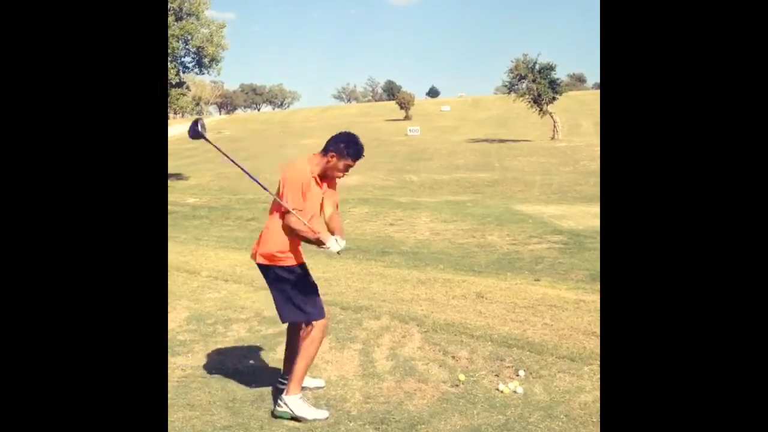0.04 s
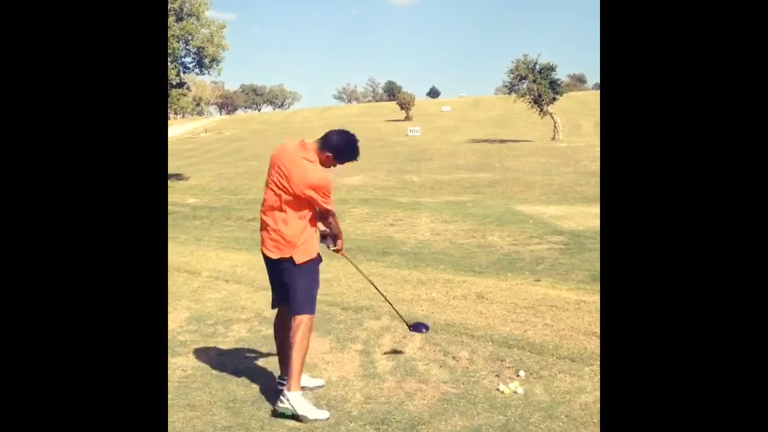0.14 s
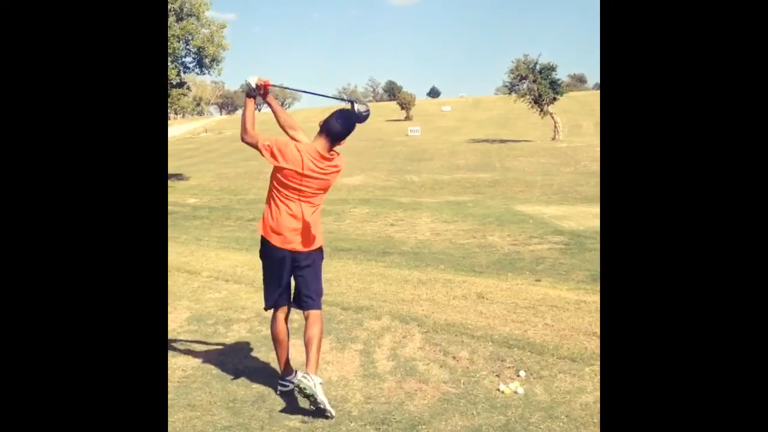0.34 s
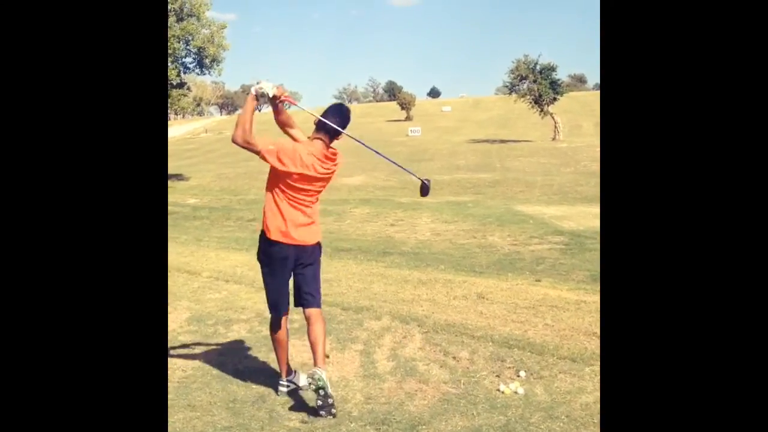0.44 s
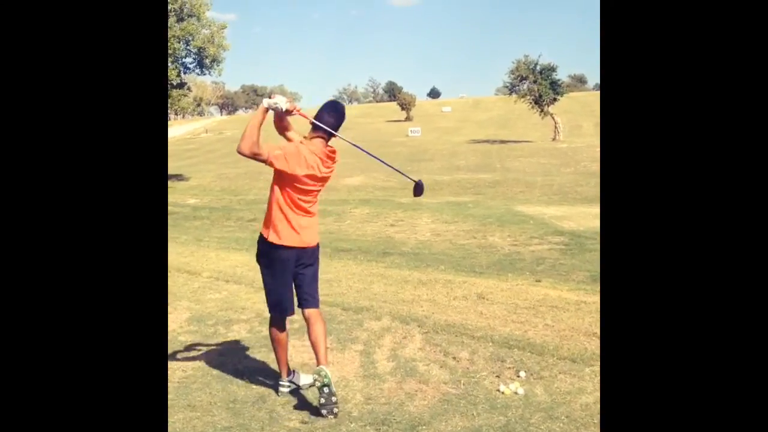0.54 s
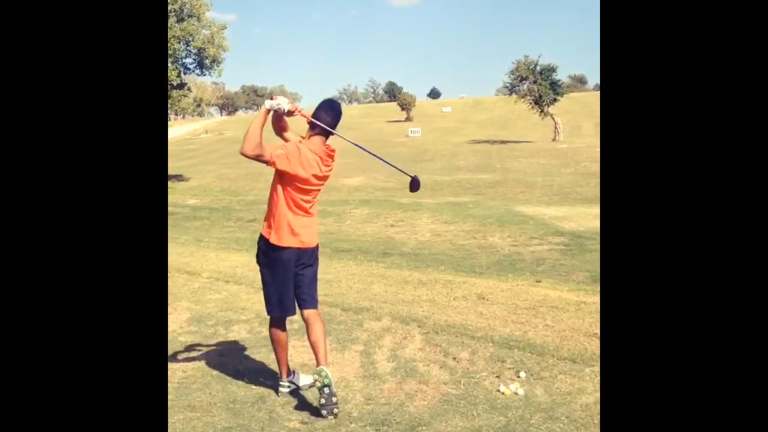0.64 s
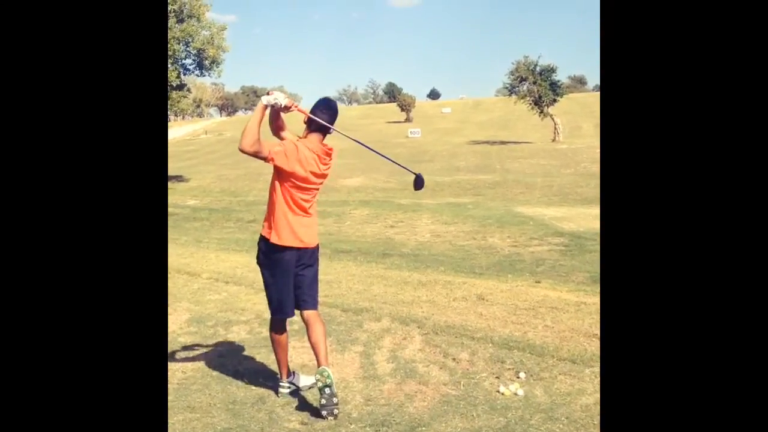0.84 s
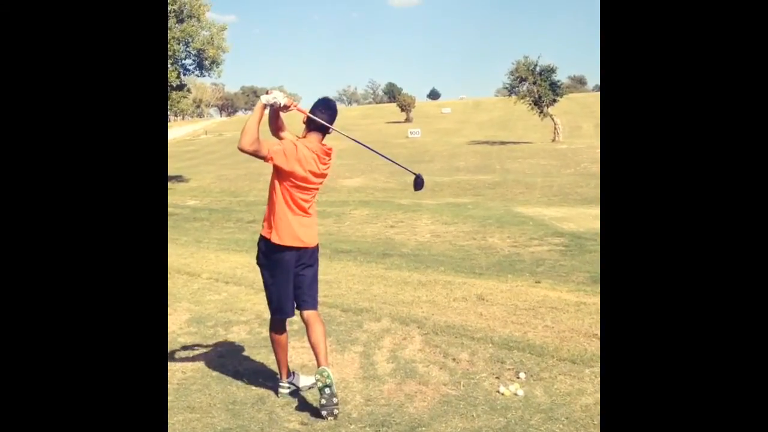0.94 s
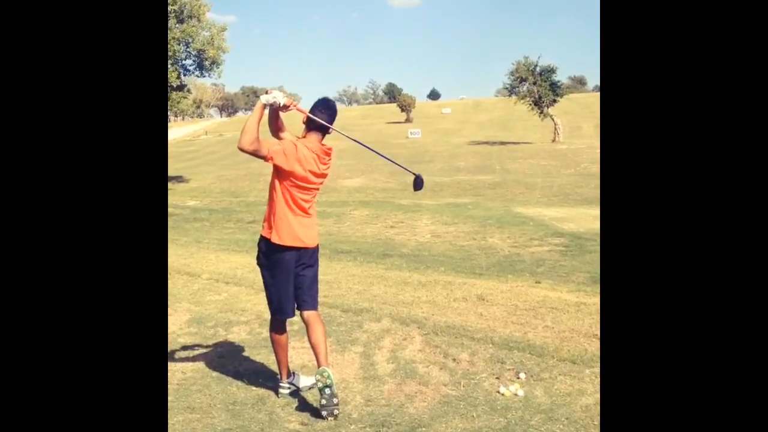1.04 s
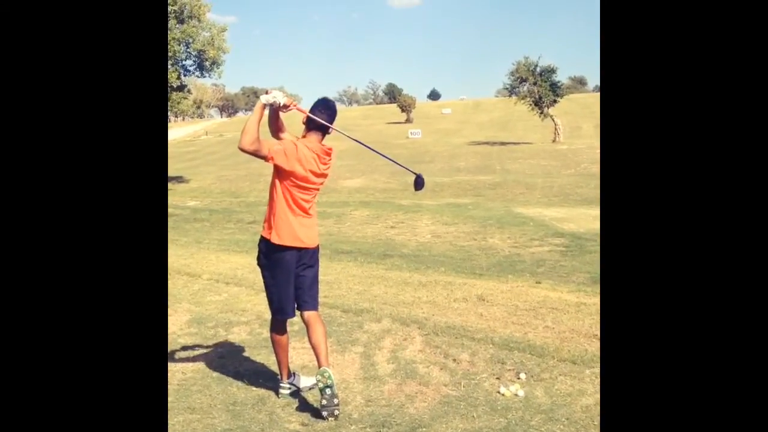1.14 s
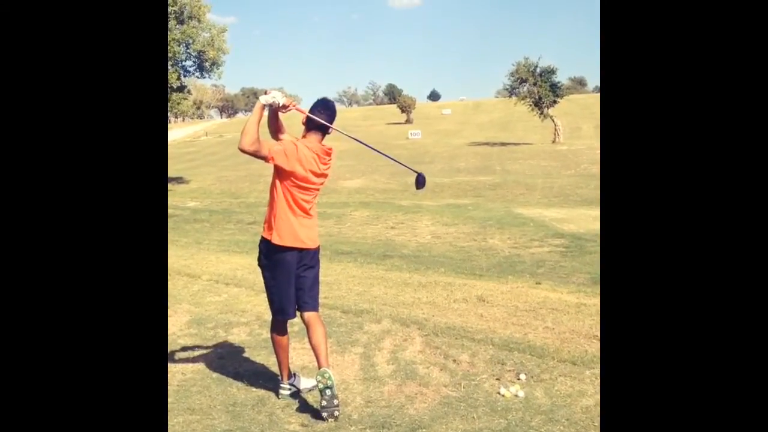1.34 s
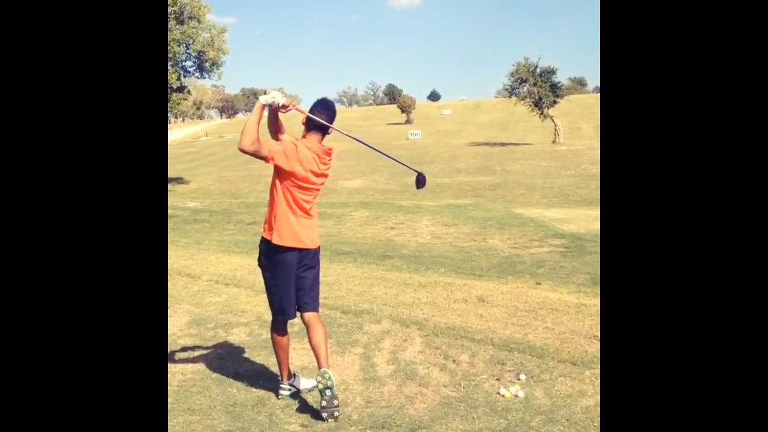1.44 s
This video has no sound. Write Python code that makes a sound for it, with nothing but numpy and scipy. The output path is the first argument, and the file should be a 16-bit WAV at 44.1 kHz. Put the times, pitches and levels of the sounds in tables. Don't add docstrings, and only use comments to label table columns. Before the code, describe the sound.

A golf driver cracks sharply into a ball outdoors after a quick swish, then soft wind thumps

```python
import sys
import numpy as np
from scipy import signal
from scipy.fft import rfft, irfft
from scipy.io import wavfile
from scipy.ndimage import uniform_filter1d

SR = 44100
rng = np.random.default_rng(int(sys.argv[2]) if len(sys.argv) > 2 else 0)


def master_out(mix):
    frames = np.transpose(np.atleast_2d(mix))
    ceiling = np.clip(frames, -1, 1)
    pcm = np.round(ceiling * 32767).astype(np.int16)
    wavfile.write(sys.argv[1], SR, pcm)


def how_loud(loudness_db):
    steps = np.asarray(loudness_db, float) / 20
    return 10 ** steps


N = 66150
T = np.arange(N) / SR
STRIKE_S = .20627
SINCE_STRIKE = np.maximum(T - STRIKE_S, 0)


def evened(x):
    return x / np.sqrt(np.mean(x ** 2) + 1e-20)


def read(points, hz):
    f, value = np.transpose(points)
    return np.interp(np.log(hz + 1), np.log(f + 1), value)


def curve(rows, col=1):
    rows = np.array(rows)
    return np.interp(T, rows[:, 0], rows[:, col])


def noise(points):
    hz = np.fft.rfftfreq(N, 1 / SR)
    spectrum = rfft(rng.standard_normal(N)) * how_loud(read(points, hz))
    return evened(irfft(spectrum, N))


def flicker(rate_hz):
    return noise([(0, 0), (rate_hz, 0), (3 * rate_hz, -40), (20000, -120)])


def resonate(x, hz, width):
    turn = np.exp(2j * np.pi * np.cumsum(hz * np.ones(len(x))) / SR)
    r = np.exp(-np.pi * width / SR)
    return 2 * (turn * signal.lfilter([1 - r], [1, -r], x / turn)).real


def blur(hz, width):
    x = rng.standard_normal(N)
    for widen in (1.4, 1.5, 1.4):
        x = resonate(x, hz, widen * width)
    return evened(x)


def wavelets(rows):
    s, db, hz, width = np.transpose(rows)[:, :, None]
    phase = 2 * np.pi * rng.random((len(rows), 1))
    bell = np.exp(-np.log(16) * ((T - s) / width) ** 2)
    return (how_loud(db) * bell * np.cos(2 * np.pi * hz * (T - s) + phase)).sum(0)


# frequency in Hz, density in dB per Hz.
CRACK_TONE = [(110, -24.5), (290, 0), (600, -19), (1800, -11.5), (5000, -12.5), (10300, -4), (11800, -13.5),
              (13000, -7), (15500, -16)]
# frequency in Hz, level in dB, 60 dB decay time in seconds.
HEAD_MODES = [(3444, -18.5, 0.12), (4120, -21.5, 0.04), (4525, -20, 0.15), (5826, -9.5, 0.076),
              (6500, -7, .045), (5980, -3.5, 0.066), (6570, -13, .06), (7580, -17.5, .04), (8130, -8, .03),
              (9100, -17, .05), (10390, -3, 0.021), (11080, -10.5, .02), (12260, -8, 0.016)]


def strike():
    blow_db, blow_hz = -3.3, 3350
    crack_db, crack_hold_s, crack_t60 = -17.5, .002, .013
    thud_db, thud_hz, thud_t60, thud_rise_s = -15.5, 860, .015, .0004
    head_db, longest_t60 = -17, .1

    t = T - STRIKE_S
    cycle = np.clip(t * blow_hz, 0, 1)
    blow = how_loud(blow_db) * np.sin(2 * np.pi * cycle ** 1.4) * (.3 + .8 * cycle)

    late = np.maximum(t - 1 / blow_hz, 0)
    crack_fall = how_loud(crack_db - 60 * np.maximum(late - crack_hold_s, 0) / crack_t60)
    crack = crack_fall * np.minimum(late / .0003, 1) * noise(CRACK_TONE)
    thud = how_loud(thud_db - 60 * late / thud_t60) * np.sin(2 * np.pi * thud_hz * t)
    thud *= np.minimum(late / thud_rise_s, 1)

    ring = np.zeros(N)
    polarity = 1
    for hz, db, t60 in HEAD_MODES:
        fall = how_loud(head_db + db - 60 * late / min(t60, longest_t60))
        ring += polarity * fall * np.sin(2 * np.pi * hz * late)
        polarity = -polarity
    return blow + crack + thud + ring * np.minimum(late / .00059, 1)


# time in seconds, level in dB.
SCATTER_LEVEL = [(.215, -26), (.233, -36), (.258, -34), (.29, -42), (.32, -52), (.405, -57.5), (.44, -63),
                 (.6, -69), (.7, -80)]
# centre in Hz, width in Hz, level in dB.
SCATTER_BANDS = [(1, 640, -7), (4745, 3800, -17.5), (6160, 330, -21.5), (6160, 600, -1.5)]
# frequency in Hz, density in dB per Hz.
SCATTER_TONE = [(300, -41.5), (600, -26.5), (2000, -16.5), (3500, -8.5), (6300, -6), (9000, -10.5),
                (14600, -14.5), (16000, -21.5)]


def near_scatter():
    glide_from_hz, glide_to_hz, glide_s = 3350, 3690, .042
    grain_db, waver_hz, sag_db_s = 3.5, 18, 18.5
    waver_depth_hz = 90
    wide_db, wide_start_s, wide_hold_s, wide_fall_db_s = -3.5, .221, .3, 40
    end_db, end_s, end_fade_s = -7, .413, .006

    bands = np.zeros(N)
    for k, (hz, width, db) in enumerate(SCATTER_BANDS):
        sag = 1
        if k == 0:
            hz = glide_to_hz + (glide_from_hz - glide_to_hz) * np.exp(-SINCE_STRIKE / glide_s)
            sag = how_loud(-sag_db_s * SINCE_STRIKE)
        grain = how_loud(db + grain_db * flicker(80))
        bands += grain * blur(hz + waver_depth_hz * flicker(waver_hz), width) * sag
    bands *= how_loud(end_db * np.clip((T - end_s) / end_fade_s, 0, 1))

    wide = how_loud(wide_db - wide_fall_db_s * np.maximum(T - wide_hold_s, 0)) * noise(SCATTER_TONE)
    wide *= np.clip((T - wide_start_s) / .006, 0, 1)
    onset = np.clip(SINCE_STRIKE / .0051, 0, 1)
    return onset * how_loud(curve(SCATTER_LEVEL) - 6) * (bands + wide)


# centre in Hz, width in Hz, level in dB.
TREE_BANDS = [(3920, 600, -2), (5000, 600, -1), (7150, 500, 0), (2510, 2100, -4), (7800, 1200, -7)]


def far_trees():
    level_db, peak_s, rise_s, fall_s = -65, .485, .03, .045
    grain_db, glide_share = 3.5, .034
    late = T - peak_s
    bloom = np.where(late < 0, np.exp(-(late / rise_s) ** 2), np.exp(-abs(late) / fall_s))
    climb = 1 - glide_share * (1 - bloom) * (late < 0)
    bands = np.zeros(N)
    for hz, width, db in TREE_BANDS:
        bands += how_loud(db + grain_db * flicker(60)) * blur(hz * climb, width)
    return how_loud(level_db) * bloom * bands


# frequency in Hz, density in dB per Hz.
SLAP_TONE = [(300, -18), (600, -1), (1300, -0.5), (2300, 2), (4000, -23.5), (16000, -53.5)]


def ground_slap():
    slap_s, slap_db, width_s = .262, -53.5, .0097
    return how_loud(slap_db) * np.exp(-((T - slap_s) / width_s) ** 2) * noise(SLAP_TONE)


# time in seconds, level in dB, whistle pitch in Hz.
SWISH_PATH = [(.05, -73, 800), (.13, -61.5, 800), (.15, -46, 850), (.165, -40.5, 860), (.18, -40, 860),
              (.19, -36.5, 830), (.197, -35, 774), (.205, -41, 810)]
# frequency in Hz, density in dB per Hz.
SWISH_TONE = [(130, -11.5), (250, 4.5), (500, -8.5), (900, -3), (1500, -11), (3000, -20.5), (6000, -26),
              (15000, -42)]


def swish():
    whistle_db, whistle_width_hz, fade_s = 3, 260, .007
    tear_db, tear_rise_db_s, tear_low_hz = -56, 198, 2534
    whistle = evened(resonate(rng.standard_normal(N), curve(SWISH_PATH, col=2), whistle_width_hz))
    air = how_loud(curve(SWISH_PATH) - 5.5) * (noise(SWISH_TONE) + how_loud(whistle_db) * whistle)
    tear = noise([(200, -30), (tear_low_hz, 0), (15000, -8)])
    tear *= how_loud(tear_db + tear_rise_db_s * np.minimum(T - STRIKE_S, 0))
    return np.exp(-SINCE_STRIKE / fade_s) * (air + tear)


# time in seconds, level in dB, low edge in Hz.
SNAPS = [
    (.4955, -33, 9000),
    (.611, -39, 11000),
    (.987, -28.5, 150),
]


def snaps():
    out = np.zeros(N)
    for s, db, low_hz in SNAPS:
        spike = how_loud(db) * (np.arange(N) == round(s * SR))
        out += signal.lfilter(*signal.butter(1, low_hz, "high", fs=SR), spike)
    return -2 * signal.lfilter(*signal.butter(1, 2500, fs=SR), out)


# time in seconds, peak level in dB, pitch in Hz, width in seconds.
KNOCKS = [
    (.102, -43, 850, .001),
    (.494, -55, 1150, .0025),
    (.262, -52, 1200, .0015),
    (.198, -38, 800, .005),
    (1.0105, -44, 520, .0022),
]


def knocks():
    return wavelets(KNOCKS)


# time in seconds, peak level in dB, pitch in Hz, width in seconds.
THUMPS = [(0.071, -47, 119, 0.0081), (0.102, -47, 322, 0.0048), (0.141, -41, 132, 0.0041),
          (0.261, -38, 134, 0.0044), (0.349, -36, 184, 0.0065), (0.389, -47, 159, 0.0079),
          (0.477, -49.5, 151.6, 0.017), (0.506, -37.5, 147, 0.0059), (0.527, -49, 162, 0.017),
          (0.571, -40, 184, 0.01), (0.702, -30.5, 184.4, 0.0058), (0.729, -28.5, 202, 0.0044),
          (0.749, -37, 165.5, 0.014), (0.785, -72, 145.6, 0.015), (0.807, -60, 176, 0.005),
          (0.843, -42, 179.8, 0.024), (0.871, -36, 203, 0.0068), (0.903, -61, 142, 0.0074),
          (0.942, -33.5, 213, 0.0076), (0.961, -30, 164, 0.011), (0.9775, -21.5, 167.4, 0.0093),
          (1.011, -28.5, 250, 0.0038), (1.039, -59, 178.6, 0.0022), (1.068, -26, 290, 0.0016),
          (1.189, -35, 163, 0.0029), (1.211, -45.0, 184, 0.0035), (1.412, -34, 188.6, 0.0061),
          (1.434, -39, 184, 0.0021), (1.448, -37.5, 179, 0.0029), (1.472, -48, 195, 0.0095)]
# time in seconds, peak level in dB, pitch in Hz, width in
# seconds.
MORE_EDDIES = [(.025, -44, 130, 0.0033), (.586, -49, 160, 0.0081), (.737, -48, 200, 0.0041),
               (.829, -33, 159.4, 0.0055), (.882, -47, 165, 0.0085), (.973, -38.5, 400, 0.0024),
               (.995, -34, 176, 0.0079), (1.017, -30.5, 258, 0.008), (1.027, -32, 227, 0.003),
               (1.059, -41, 254, 0.0021), (1.075, -38, 183, 0.0062), (1.268, -43.5, 138, 0.0032),
               (1.333, -44.5, 174, 0.0044), (1.425, -55, 194, 0.0024), (.371, -44, 154, 0.013),
               (.298, -50.5, 245, 0.007)]
# time in seconds, level in dB.
BUFFET_LEVEL = [(0, -61), (.12, -56.5), (.3, -59), (.38, -53.5), (.42, -70.5), (.47, -56), (.59, -57),
                (.63, -66), (.69, -54.5), (.75, -52.5), (.9, -49), (.92, -56.5), (1.0, -38.5),
                (1.09, -55.5), (1.24, -57), (1.39, -64), (1.43, -49.5), (1.5, -58)]
# frequency in Hz, density in dB per Hz.
BUFFET_COLOUR = [(15, -68), (25, -35), (43, -31), (87, -6.5), (119, 9), (173, 4.5), (255, -14), (292, -3.5),
                 (900, -58.5), (1170, -67), (1980, -120)]


def wind():
    lumpy_db, lumps_hz = 2.5, 40.2
    wake_db, wake_s, wake_hz = -21.5, .012, 326
    rumble_db, rumble_hz, rumble_width_hz = -71.5, 80, 96

    bed = how_loud(curve(BUFFET_LEVEL) + lumpy_db * flicker(lumps_hz)) * noise(BUFFET_COLOUR)
    eddies = np.array(list(THUMPS) + list(MORE_EDDIES))
    s, db = eddies[:, :1], eddies[:, 1:2]
    wake = (how_loud(db + wake_db) * np.exp(-((T - s) / wake_s) ** 2)).sum(0)
    lowpass = signal.butter(4, wake_hz, fs=SR, output="sos")
    flutter = evened(signal.sosfilt(lowpass, rng.standard_normal(N)))
    rumble = how_loud(rumble_db) * blur(rumble_hz, rumble_width_hz)
    return bed + rumble + wake * flutter + wavelets(eddies)


# frequency in Hz, density in dB per Hz.
HISS_TONE = [(250, -11.5), (600, 3), (2000, -3), (3800, -1.5), (6500, -6.5), (8000, -12), (10000, -21),
             (15000, -20)]
# time in seconds, level in dB.
HISS_CURVE = [(0, -66), (.15, -67), (.27, -65), (.36, -76.5), (.45, -73.5), (.6, -73.5), (1.1, -73),
              (1.35, -71), (1.5, -71)]


def hiss():
    lift_db, patchy_db = 7, .6
    frames, hz = N // 128 + 5, np.fft.rfftfreq(512, 1 / SR)
    a, b, patches = rng.standard_normal((frames, 257, 3)).T
    patches = uniform_filter1d(patches, size=6, axis=0)
    patches = evened(uniform_filter1d(patches, size=20, axis=1))
    z = (a + 1j * b) * how_loud(read(HISS_TONE, hz)[:, None] + patchy_db * patches)
    smooth = signal.istft(z, nperseg=512, noverlap=384)[1][:N]
    return how_loud(curve(HISS_CURVE) + lift_db) * evened(smooth)


def scene():
    hit = strike() + near_scatter() + far_trees() + ground_slap()
    return (hit + swish() + snaps() + knocks() + wind() + hiss())[None]


def band_limit(x):
    return signal.sosfilt(signal.butter(12, 16550, fs=SR, output="sos"), x)


def record(dry):
    low_hz, top_hz = 70, 15300
    x = signal.sosfilt(signal.butter(3, low_hz, "high", fs=SR, output="sos"), dry)
    below = signal.oaconvolve(x, signal.firwin(255, top_hz, fs=SR)[None], "same")
    return band_limit(below + how_loud(-38) * (x - below))


dry = scene()
out = record(dry)
master_out(out)
```